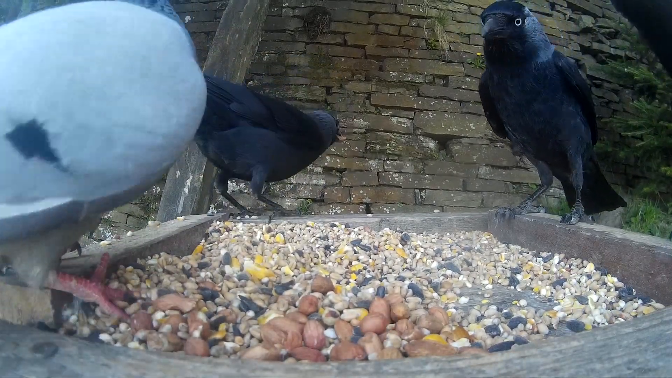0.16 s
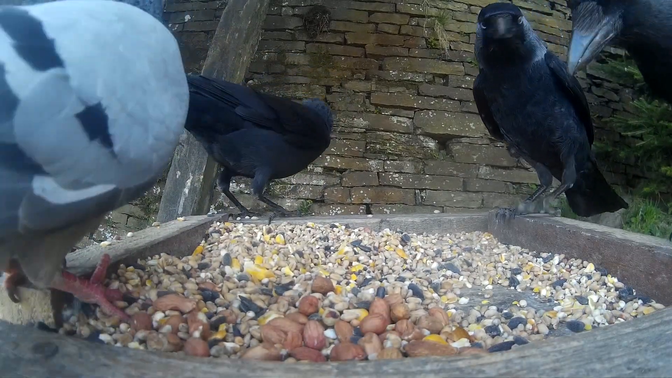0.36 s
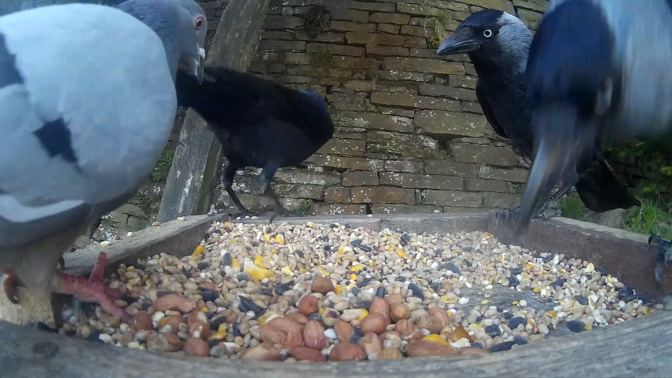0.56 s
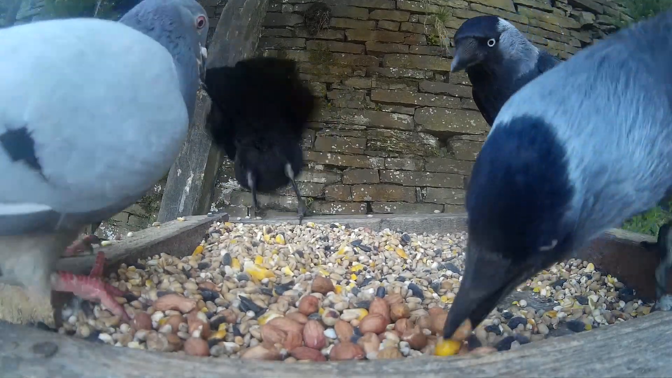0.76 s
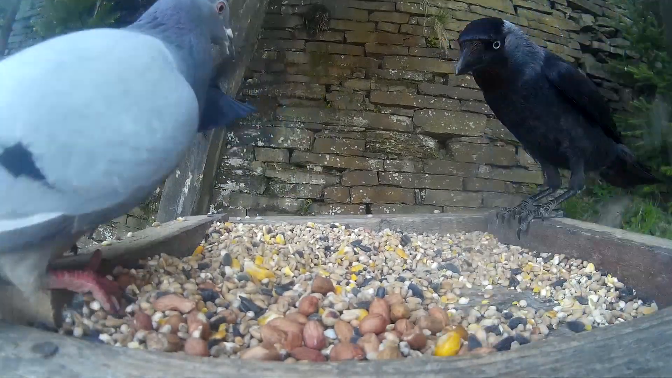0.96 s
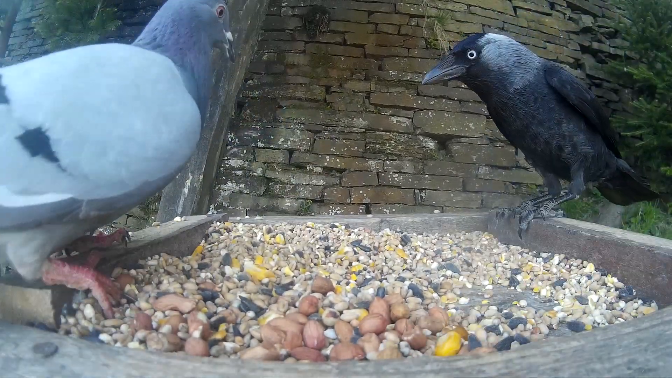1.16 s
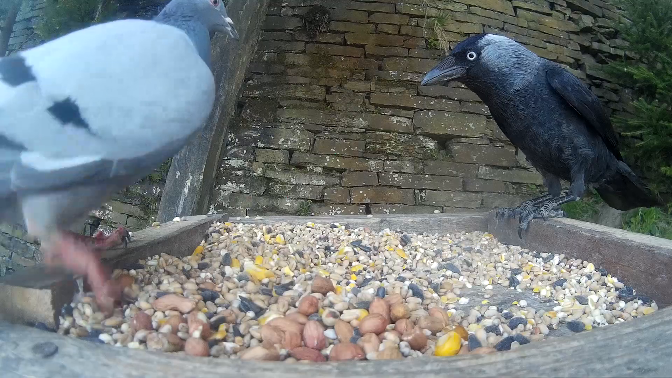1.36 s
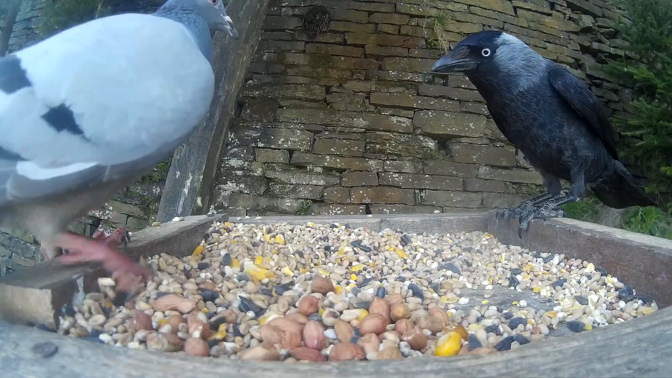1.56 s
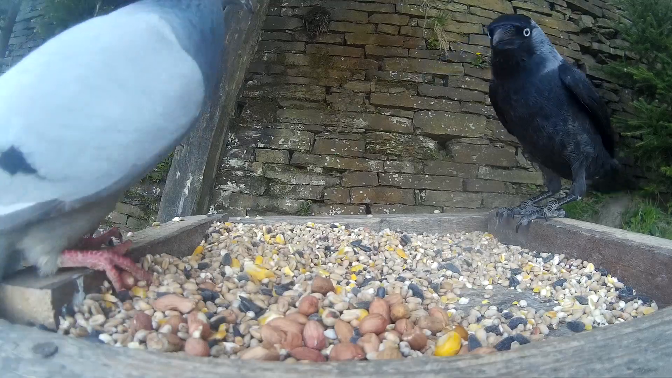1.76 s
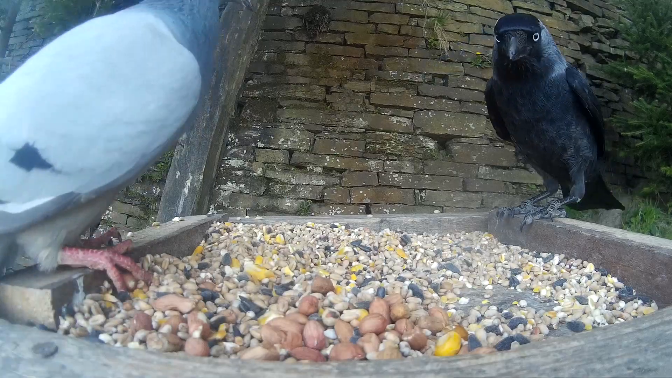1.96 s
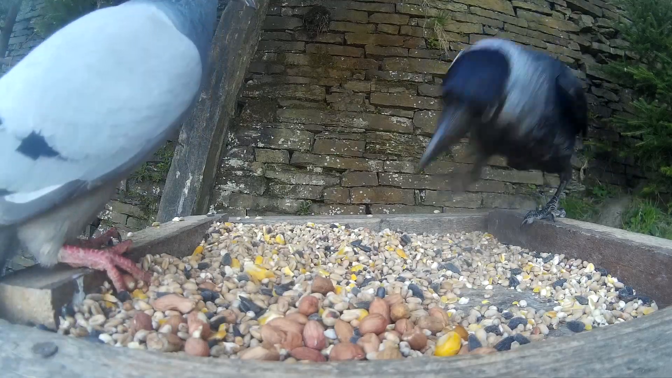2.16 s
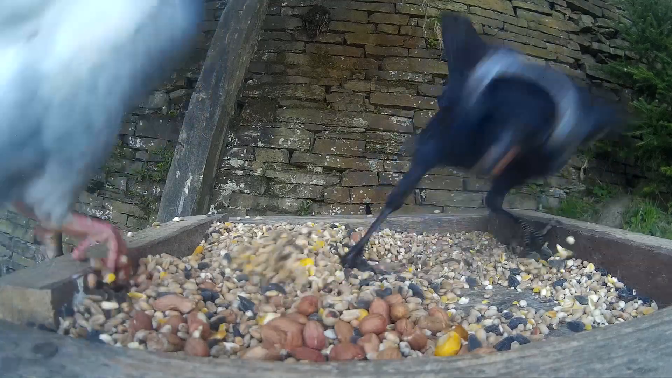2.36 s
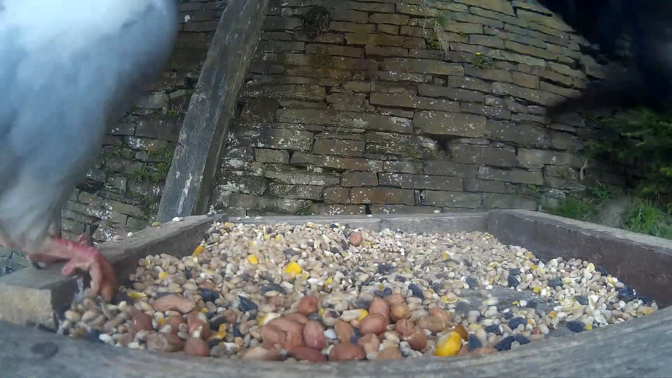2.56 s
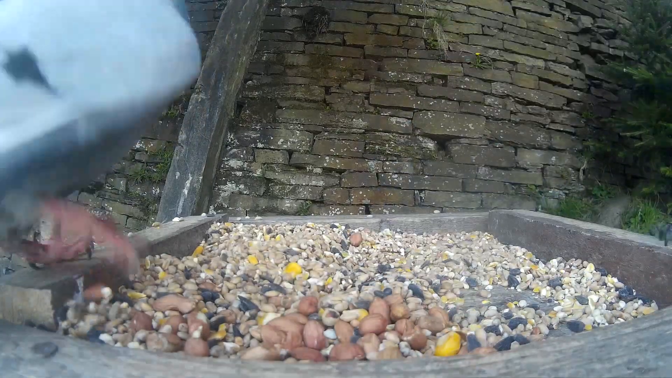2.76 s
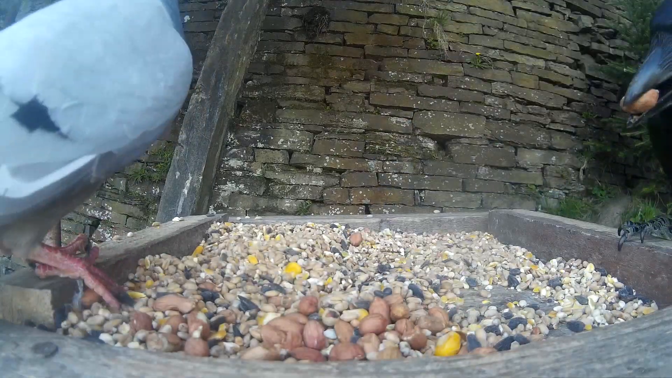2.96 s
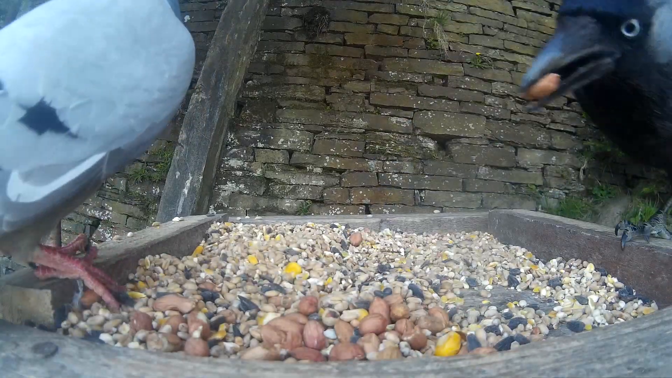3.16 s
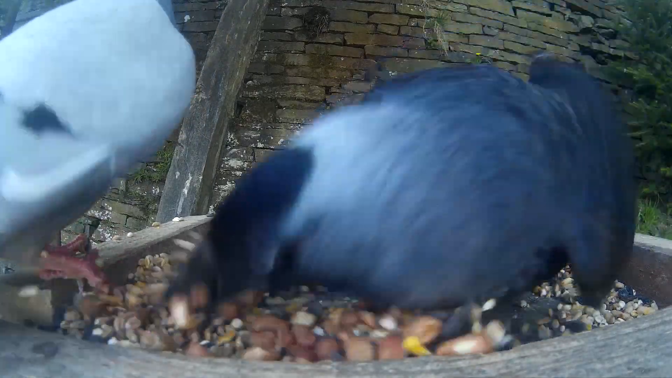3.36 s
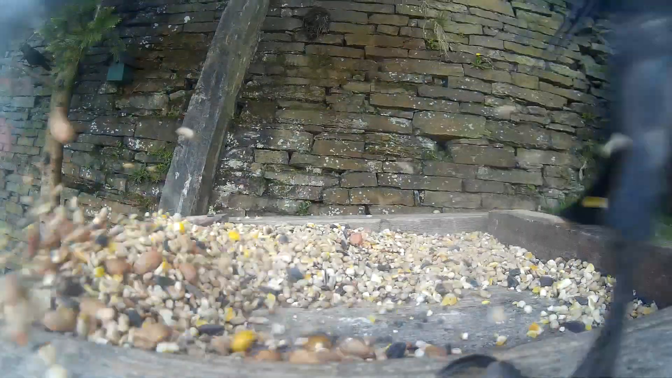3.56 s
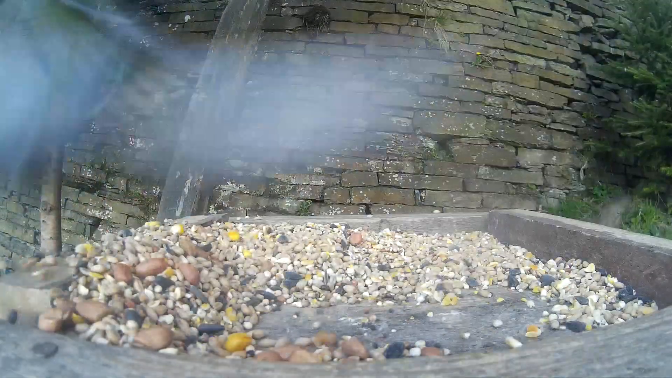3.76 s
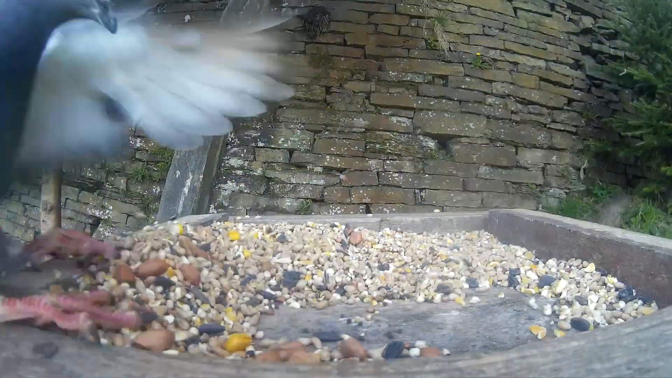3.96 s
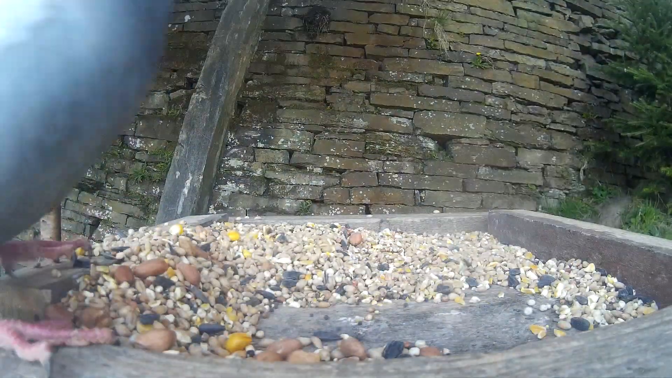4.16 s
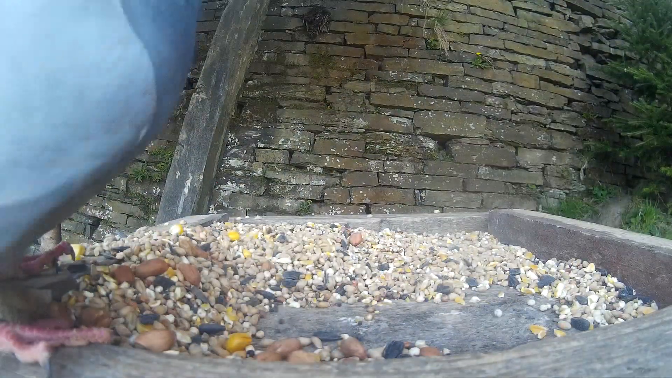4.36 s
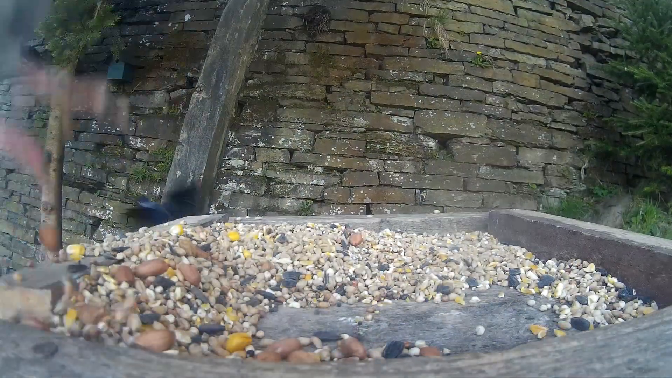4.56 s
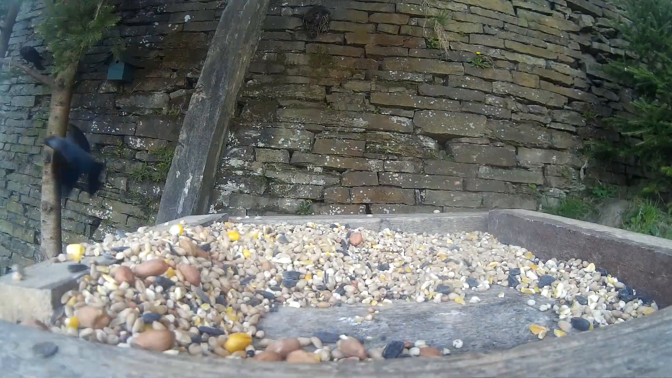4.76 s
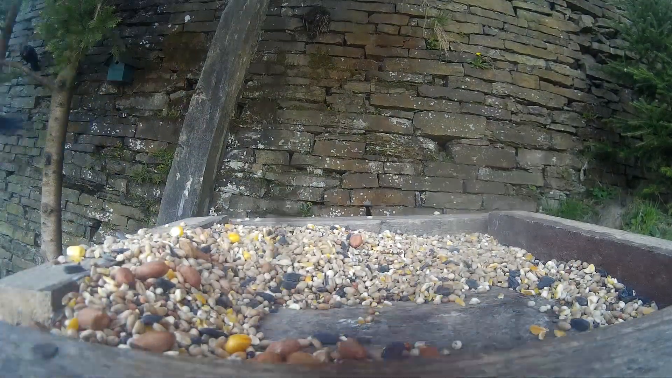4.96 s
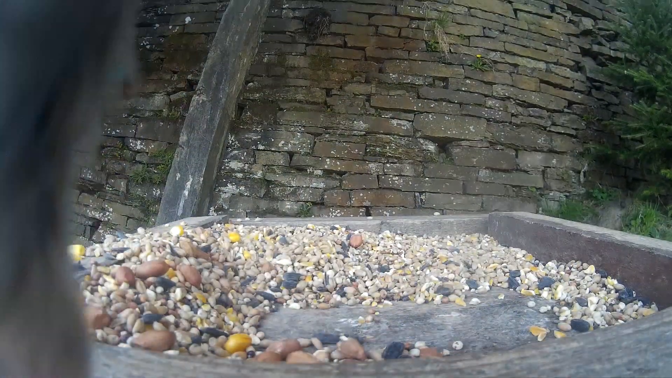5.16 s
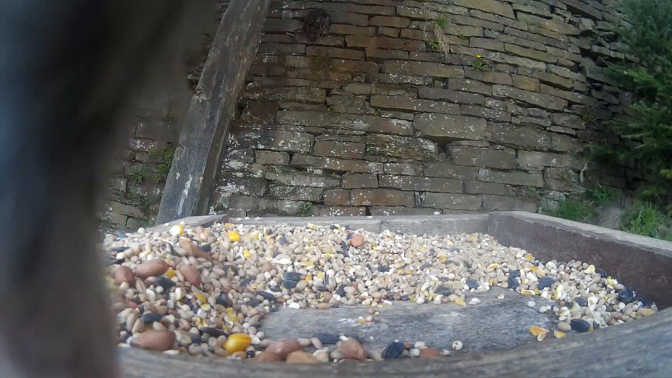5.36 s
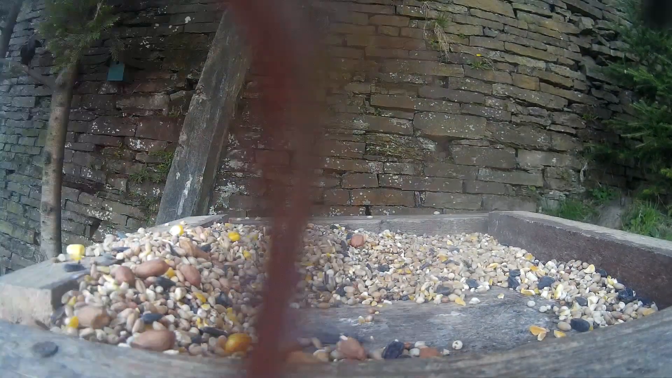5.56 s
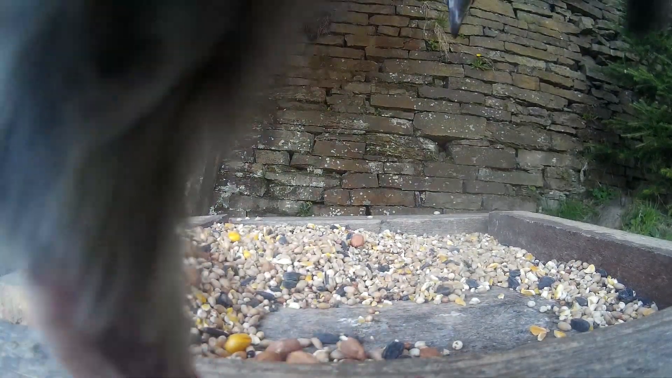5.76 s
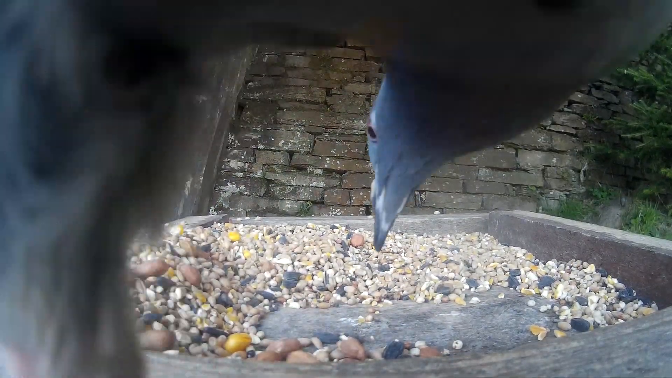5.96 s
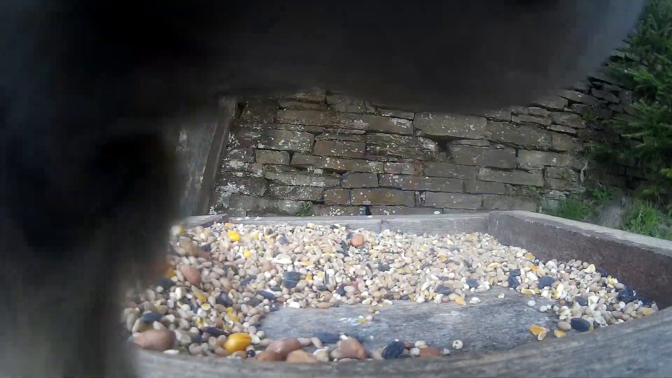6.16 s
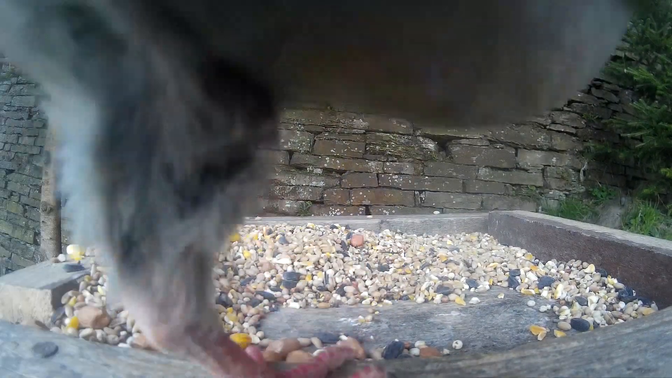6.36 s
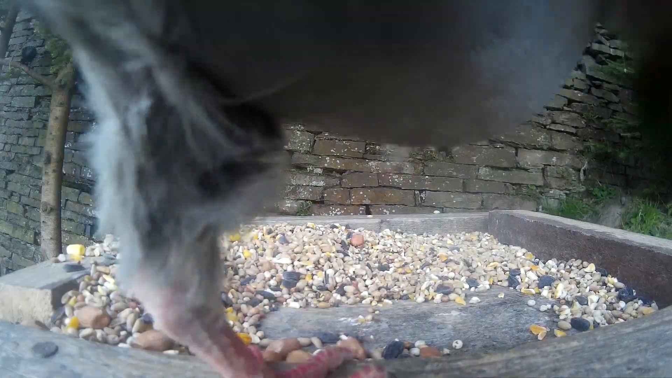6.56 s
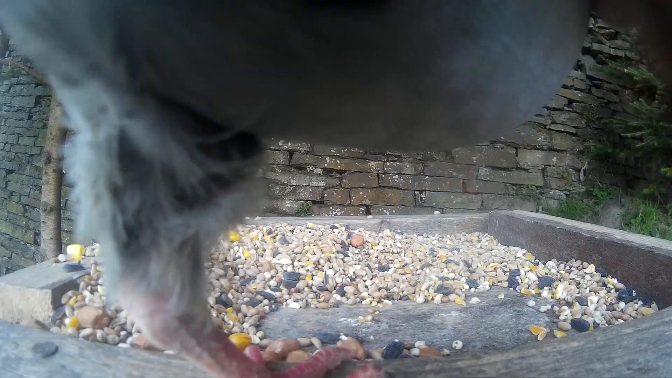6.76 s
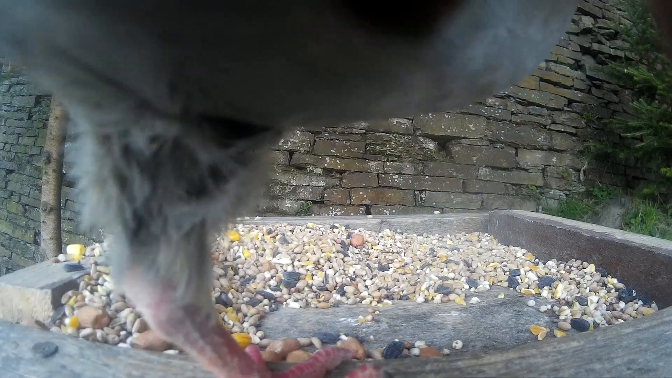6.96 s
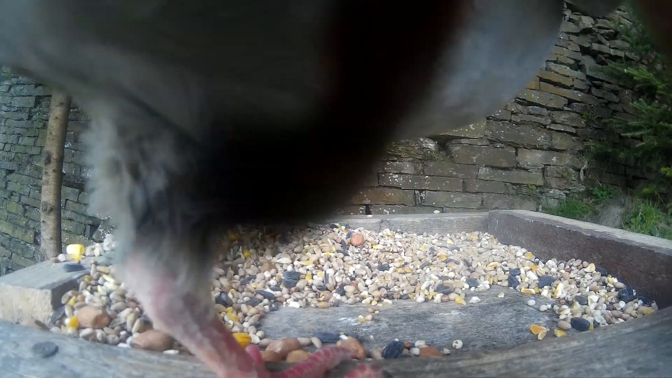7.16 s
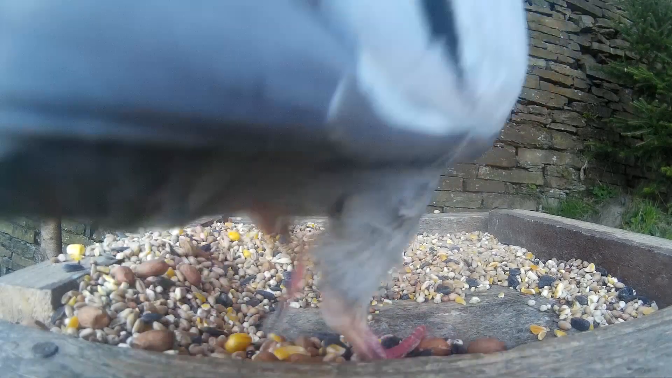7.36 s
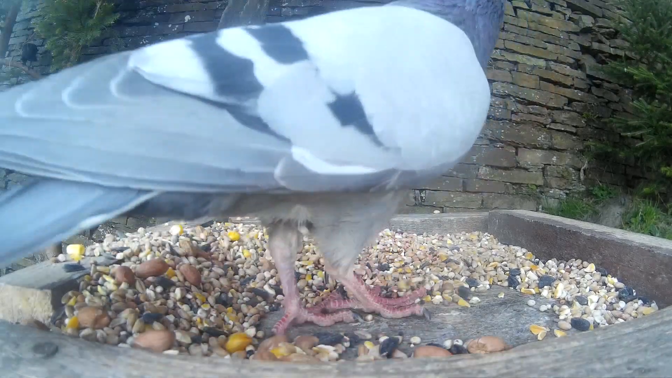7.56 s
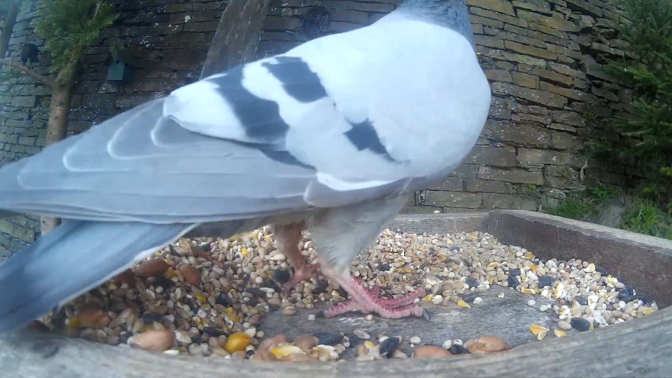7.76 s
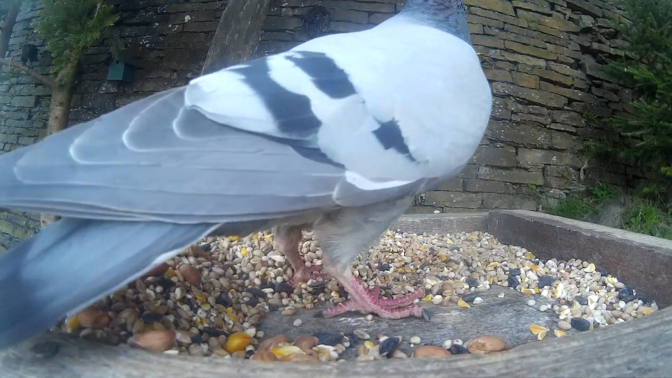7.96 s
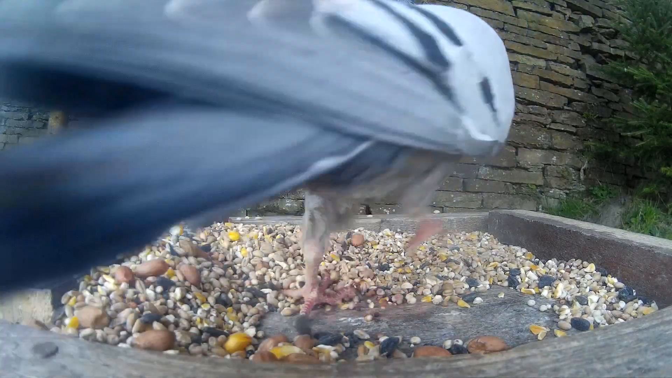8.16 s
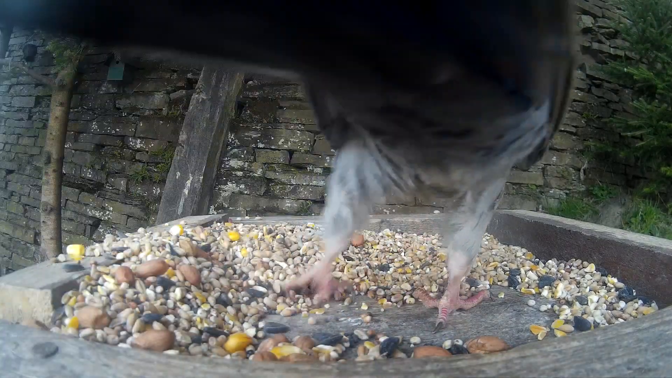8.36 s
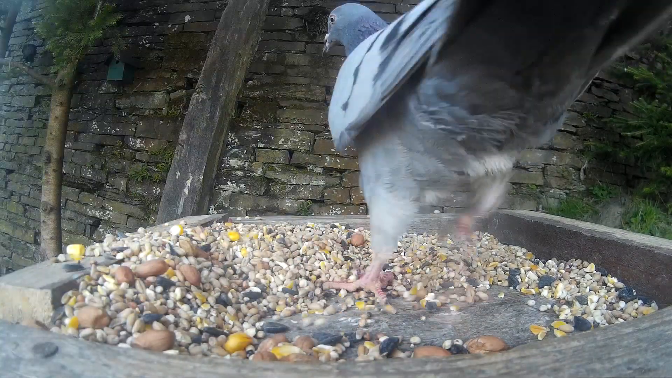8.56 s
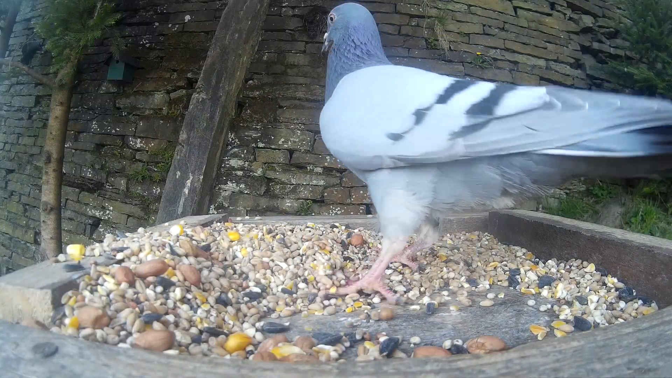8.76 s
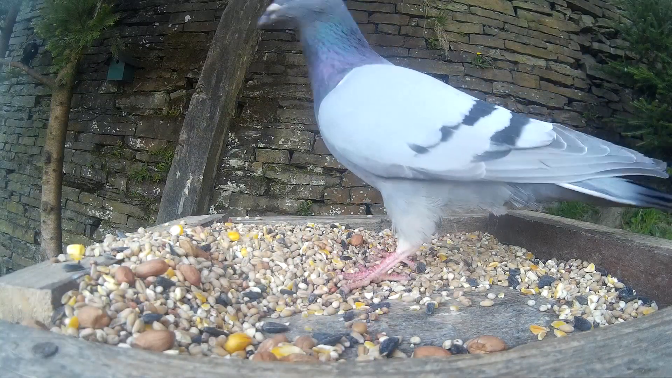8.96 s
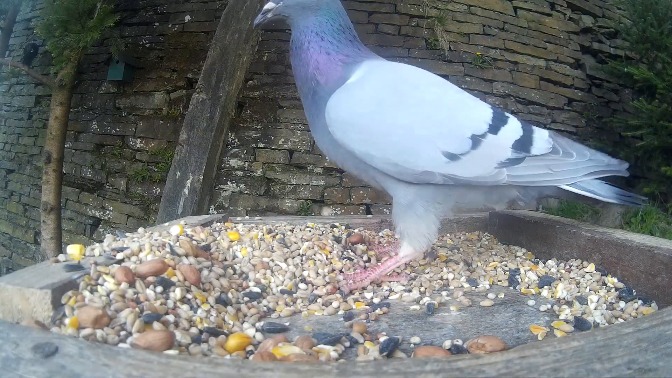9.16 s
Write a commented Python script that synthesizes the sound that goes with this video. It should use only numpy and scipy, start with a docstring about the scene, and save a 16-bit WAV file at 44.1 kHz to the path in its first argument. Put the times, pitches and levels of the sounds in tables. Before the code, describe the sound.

Pigeons and jackdaws feed on a hollow wooden table that carries the microphone. Light steps, dry taps and short scrapes through seed come first, with low wing puffs. Then a big takeoff: a rush of scattering seed, hard distorted knocks and booming wing gusts, with a second burst soon after and a brief metallic ring. Afterwards only sparse taps and faint rustles remain over soft distant hum and hiss.

```python
"""Birds on a wooden feeding table

Pigeons and jackdaws scrabble, peck and take off on a bird table that carries the microphone.
Blows, steps, taps and seed grains are noise forces that ring the resonant boards; wing beats are low
noise gusts on the membrane, and the loudest moments overload the input. A small metal fitting rings
as decaying sines after a few blows; far birds call in glides over shaped noise of traffic and hiss."""
import sys
import numpy as np
from scipy import signal
from scipy.fft import rfft, irfft, next_fast_len
from scipy.io import wavfile
from scipy.ndimage import uniform_filter1d

SR = 44100
rng = np.random.default_rng(int(sys.argv[2]) if len(sys.argv) > 2 else 0)


def dump_mix(stems):
    """Bounce the given channels to the path in sys.argv[1] as a 16-bit WAV at rate SR."""
    frames = np.atleast_2d(stems).T  # one column per channel
    limited = np.clip(frames, -1, 1)  # hard clip at full scale
    pcm = np.round(limited * 32767).astype(np.int16)
    wavfile.write(sys.argv[1], SR, pcm)


N = 409688


def amp(db):
    """Gain of a level in dB."""
    return 10 ** (np.asarray(db) / 20)


def evened(x):
    """Scales to rms 1."""
    return x / np.sqrt(np.mean(x ** 2) + 1e-20)


def mode(f, hz, width):
    """Causal response of one resonance, gain 1 at its centre."""
    return 1j * f * width / (hz ** 2 - f ** 2 + 1j * f * width)


def through(x, response):
    """Filters by a function of frequency."""
    size = next_fast_len(len(x))
    f = np.fft.rfftfreq(size, 1 / SR)
    return irfft(rfft(x, size) * response(f), size)[:len(x)]


def wander(hz):
    """Random drift of rms 1, falling off in speed above hz."""
    return evened(through(rng.standard_normal(N), lambda f: 1 / (1 + (f / hz) ** 2)))


def add(mix, s, sound):
    """Mixes a sound in at a time in seconds."""
    part = mix[max(round(s * SR), 0):][:len(sound)]
    part += sound[:len(part)]


def boards(f):
    """All board modes together, steep-sided, with dark valleys between them."""
    # modes of the boards: f/Hz, half the width at half amplitude/Hz, level/dB
    board_modes = [(164.2, 24, 5.5), (324.2, 50, 0.5), (507, 55, 1), (730, 55, -2), (855.4, 44.4, 3),
                   (990, 32, -7), (1189, 72.3, 0.5), (1382, 92, -4), (1637, 110, -5), (1834, 150, -10),
                   (2081, 52.4, -4.5), (2416, 157, -9.5), (2953, 160, -15.5), (3317, 180, -13.5),
                   (4276, 615, -24.5), (5660, 250, -36), (8030, 900, -38.5), (11000, 1500, -49)]
    response = 0
    for k, (hz, half_width, db) in enumerate(board_modes):
        sign = (-1) ** k
        response = response + sign * amp(db) * mode(f, hz, 2.01 * half_width) ** 2
    return response


def peak_evened(x):
    """Scales the strongest 3 ms to the rms of a sine of peak 1."""
    return x / np.sqrt(2 * uniform_filter1d(x ** 2, size=130).max())


def knock(db, hz, contact_s, click_db, thud_db):
    """A short rough contact rings the modes near the place struck, with a sharp click and a thud."""
    noise = rng.standard_normal((2, 6000))
    u = np.arange(6000) / SR / max(contact_s - .003, .0012)
    contact = u ** 0.7 * np.exp(-1.8 * u ** 2)  # force rises, holds and lets go

    def ring_response(f):
        near_place = 0.22 + mode(f, hz, .35 * hz)
        return boards(f) * near_place * 1j * f / (500 + 1j * f)

    ring = through(noise[0] * contact, ring_response)
    click = through(noise[1] * contact ** 2.0, lambda f: mode(f, 4900, 8000) ** 2 / (1 + 1j * f / 12000))
    thud = through(noise[0] * contact, lambda f: boards(f) * mode(f, 320, 400) ** 2)
    # click and thud levels are set against the ring
    return amp(db) * (peak_evened(ring) + amp(click_db) * peak_evened(click) + amp(thud_db) * peak_evened(thud))


def blows():
    """Hard blows of wings and claws; those that strike a low pitch carry more thud."""
    # t/s, ring level/dB, struck f/Hz, contact/s, click against the ring/dB
    hard_blows = [(2.404, -11.5, 1590, .013, -29.5), (2.475, -30.5, 1740, .0052, -7.5),
                  (3.421, -11, 1530, .02, -34), (3.516, -14, 1810, .017, -28.5),
                  (3.551, 7, 680, .016, -14.5), (3.614, 2.5, 2080, .014, -16.5),
                  (3.671, -8.5, 940, .0068, -7.5), (3.74, -9, 970, .0071, -15.5),
                  (3.764, -11, 2530, .0073, -36.5), (3.781, -18, 785, .0036, -24),
                  (3.812, -6.5, 824, .009, -33), (3.869, 6, 660, .01, -22), (3.906, -3.5, 650, .014, -30.5),
                  (3.981, 1.5, 1420, .0046, -15), (4.074, -28, 1190, .0075, -25),
                  (4.118, -12, 1000, .018, -28), (4.541, -1.5, 769, .003, -24),
                  (4.969, 8.5, 1050, .013, -21), (5.019, -8, 1620, .0063, -37),
                  (5.137, -1.5, 1300, .004, -14), (5.225, -18.5, 2140, .0089, -18),
                  (5.257, -31, 1000, .0081, -21), (5.275, -21, 850, .017, -6),
                  (5.309, -13, 2290, .0043, -15), (5.319, -19, 850, .011, -22),
                  (5.608, -9.5, 2900, .0077, -20)]
    thud_at_700_hz_db, thud_db_per_octave = -5.0, -15
    out = np.zeros(N)
    for s, db, hz, contact_s, click_db in hard_blows:
        thud_db = thud_at_700_hz_db + thud_db_per_octave * np.log2(hz / 700)
        add(out, s, knock(db, hz, contact_s, click_db, thud_db))
    return out


def steps():
    """Steps and hops put the bird's weight into the boards, so the thud is strong and the click weak."""
    # t/s, ring level/dB, struck f/Hz
    footfalls = [(.012, -16, 500), (.246, -28.5, 774), (.638, -18, 1290), (.863, -12, 950),
                 (.879, -12, 700), (1.046, -22, 1290), (1.617, -35, 2030), (1.816, -40.5, 1760),
                 (2.708, -10.5, 1230), (2.793, -16, 1240), (3.726, -6, 830), (3.954, -8, 740),
                 (4.237, -17, 728), (4.659, -29, 1260), (5.285, -19, 330), (6.203, -26.5, 1150),
                 (6.338, -23.5, 1266), (6.993, -29.5, 1053)]
    out = np.zeros(N)
    for s, db, hz in footfalls:
        add(out, s, knock(db, hz, contact_s=.011, click_db=-52, thud_db=-3.5))
    return out


def taps():
    """Beak and claw taps are dry and light, with little thud."""
    # t/s, ring level/dB, struck f/Hz, contact/s
    light_taps = [(.087, -20.5, 1190, .0054), (.115, -20, 1190, .027), (.594, -23, 1260, .0085),
                  (.929, -19, 1410, .017), (1.448, -33, 800, .01), (2.311, -20, 1280, .0059),
                  (2.376, -19, 880, .011), (2.652, -24, 780, .0076), (2.724, -12.5, 747, .019),
                  (2.765, -12, 1270, .016), (2.962, -35, 1800, .006), (2.991, -30, 1770, .0075),
                  (3.01, -30, 1780, .0061), (3.05, -33, 1300, .01), (3.09, -28.5, 1290, .0083),
                  (3.217, -24, 1320, .02), (4.696, -26.5, 790, .012), (5.524, -30.5, 840, .029),
                  (5.934, -22.5, 830, .016), (5.971, -23, 914, .021), (6.082, -32, 1296, .008),
                  (6.268, -29.5, 825, .011), (6.584, -21, 1040, .017), (6.623, -13.5, 1020, .009),
                  (6.678, -25, 1100, .035), (6.85, -28, 1280, .015), (6.918, -20.5, 1160, .0067),
                  (7.305, -15, 1400, .0064), (7.402, -25.5, 850, .019), (7.558, -32, 1320, .012),
                  (8.231, -28, 1300, .021), (8.528, -26.5, 1270, .012), (8.756, -33.5, 840, .016),
                  (8.872, -33, 1460, .0049), (9.175, -31, 1900, .016)]
    out = np.zeros(N)
    for s, db, hz, contact_s in light_taps:
        add(out, s, knock(db, hz, contact_s, click_db=-48, thud_db=-20))
    return out


def scrabble_pressure():
    """Claws drag through seed at an easing pressure; kicked-up seed rattles down and settles fast."""
    # claws dragged through the seed: t/s, length/s, starting pressure level/dB
    scrapes = [(0.0, .065, -36), (.087, .093, -41), (.191, .027, -42), (.464, .022, -46), (.514, .045, -42),
               (.572, .05, -41), (.675, .07, -39), (.785, .06, -43), (.835, .08, -35), (.918, .05, -32),
               (1.635, .13, -55), (2.226, .27, -30), (2.498, .11, -39), (2.65, .06, -43), (2.71, .12, -36),
               (2.836, .096, -48), (3.15, .065, -46), (3.208, .062, -36), (3.3, .03, -36), (3.33, .25, -23),
               (3.63, .4, -41), (4.03, .09, -40), (4.12, .1, -47), (4.475, .07, -40), (5.272, .07, -36),
               (5.612, .03, -37), (5.724, .057, -55), (5.883, .05, -50), (5.94, .07, -40),
               (6.054, .11, -52), (6.25, .04, -38), (6.312, .25, -50), (6.547, .18, -46), (7.11, .05, -44),
               (7.156, .05, -35), (7.36, .08, -40), (7.45, .23, -51), (7.727, .081, -55), (8.124, .14, -45),
               (8.265, .2, -57), (8.466, .11, -43), (8.643, .053, -45), (8.694, .17, -54)]
    # seed kicked up: t/s, starting pressure level/dB
    scatters = [(3.552, -19), (4.627, -47), (4.98, -21), (7.31, -29), (8.875, -46)]
    ease_db = -3.0  # over each scrape
    settle_db_per_s, settle_s = -190, .11
    pressure = np.full(N, amp(-65))  # seed keeps settling faintly between scrapes
    strokes = [(s, length, db, ease_db) for s, length, db in scrapes]
    strokes += [(s, settle_s, db, settle_db_per_s * settle_s) for s, db in scatters]
    for s, length, from_db, change_db in strokes:
        db = from_db + np.linspace(0, change_db, round(length * SR))
        fade = signal.windows.tukey(len(db), min(0.02 / length, 1))
        add(pressure, s, amp(db) * fade)
    return pressure


def scrabble():
    """Grains in loose clumps ring the boards at several spots: sparse when light, a rush when hard."""
    # spots on the boards, each favouring the modes near one pitch: f/Hz
    spots_hz = [830, 1300, 2080, 3300, 9000]
    grains_per_s = 2000  # at each spot, in a full rush
    rush_db, lightest_share = -32, .11
    pressure = scrabble_pressure()
    share = np.clip(pressure / amp(rush_db), lightest_share, 1)  # share of the seeds that move
    count = next_fast_len(N)
    f = np.fft.rfftfreq(count, 1 / SR)
    wood = boards(f) * 1j * f / (280 + 1j * f)
    clumps_db = 3 * np.clip(wander(50.), -2, 2)  # shared by all spots
    out, full_rush = 0, 0
    for hz in spots_hz:
        size_db = 3 * np.minimum(rng.exponential(1, N), 3) + 3 * np.clip(wander(25.), -2, 2)
        size = amp(size_db + clumps_db) * rng.standard_normal(N)
        lot = rng.random(N) * SR / grains_per_s  # a grain falls where its lot is below the share
        spot = wood * (.25 + mode(f, hz, .4 * hz))
        moved = size * (lot < share) * pressure / np.sqrt(share)  # fewer grains, each stronger
        out = out + rfft(moved, count) * spot
        full_rush = full_rush + rfft(size * (lot < 1), count) * spot
    # the full rush at unit pressure sets the level
    return amp(2.0) * irfft(out, count)[:N] / np.std(irfft(full_rush, count))


def gusts():
    """Each wing beat is a lumpy push on the membrane, with faster eddies in bursts."""
    # wing draught over the microphone: t/s at the middle, level/dB; the nearer the wing, the stronger
    wing_beats = [(.033, -48), (.606, -49), (.86, -32), (1.04, -33), (1.13, -34), (1.278, -27),
                  (1.493, -32), (1.574, -36), (2.123, -44.5), (2.349, -35), (2.468, -30), (2.538, -24),
                  (2.65, -32), (2.747, -30), (3.37, -44), (3.46, -42), (3.557, -18.5), (3.717, -17),
                  (3.816, -8), (3.897, 0), (3.987, -2.5), (4.08, -34), (4.18, -36), (4.51, -31),
                  (4.575, -14), (4.72, -33), (4.83, -19), (4.882, -8.5), (4.95, -13), (5.0, -14),
                  (5.07, -30), (5.293, -42)]
    shortest_s, longer_s_per_db = .04, .0018  # a gust at 0 dB, and what each dB below it adds
    push = evened(through(rng.standard_normal(N), lambda f: mode(f, 27, 47) / (1 + 1j * f / 220) ** 2))
    bursts = amp(5.6 * np.clip(wander(20.0), -2, 2))
    eddies = through(rng.standard_normal(N) * bursts, lambda f: mode(f, 180, 330) / (1 + 1j * f / 1200) ** 3)
    eddies = amp(-0.8) * evened(eddies)
    t, out = np.arange(N) / SR, np.zeros(N)
    for s, db in wing_beats:
        length = shortest_s - longer_s_per_db * db
        near = slice(max(round((s - .3) * SR), 0), round((s + .3) * SR))
        swell = np.exp(-.9 * abs(2 * (t[near] - s) / length) ** 1.6)
        gust = (push[near] + eddies[near] * swell) * swell  # eddies break off at the crest
        out[near] += amp(db) * gust * np.linalg.norm(swell) / np.linalg.norm(gust)
    return out


def fitting():
    """The small metal fitting rings in slowly dying modes; the close pair beats."""
    # modes of the metal: f/Hz, time to fall by 60 dB/s
    metal_modes = [(1513, .35), (1577, .3), (2482, .45)]
    # when it is set ringing: t/s, then the starting level/dB of each mode
    rings = [(3.985, -46, -46, -50), (4.985, -19, -23, -60), (5.07, -60, -60, -50), (5.612, -70, -70, -47),
             (6.925, -46, -52, -70)]
    out, t = np.zeros(N), np.arange(SR // 2) / SR
    for s, *levels_db in rings:
        for (hz, t60), db in zip(metal_modes, levels_db):
            add(out, s, amp(db - 60 * t / t60) * np.sin(2 * np.pi * hz * t))
    return out


def far_calls():
    """Far birds call in soft glides that swell and fade, blurred by distance."""
    # t/s, length/s, from f/Hz, to f/Hz, level before the blur/dB
    glides = [(1.49, .05, 2150, 1850, -57), (1.8, .24, 330, 355, -53), (7.97, .11, 2620, 1900, -59),
              (9.05, .075, 2750, 1900, -60)]
    out = np.zeros(N)
    for s, length, from_hz, to_hz, db in glides:
        hz = np.linspace(from_hz, to_hz, round(length * SR))
        swell = np.hanning(len(hz)) ** .5
        add(out, s, amp(db) * swell * np.sin(2 * np.pi * np.cumsum(hz) / SR))
    blur = .6 + .8 * wander(150.)
    return out * blur


def air():
    """Steady noise shaped as far traffic hum and microphone hiss."""
    # spectrum of hum and hiss: f/Hz, relative level per Hz/dB
    spectrum = [(15, -47), (25, -0.5), (108, -8.5), (177, -4), (349, -7), (568, -5), (878, -0.5),
                (1150, -12), (1680, -19), (2820, -36.5), (6040, -34), (14400, -35.5), (16500, -56.5)]
    hz, db = np.transpose(spectrum)
    hum = through(rng.standard_normal(N), lambda f: amp(np.interp(np.log(f + 1), np.log(hz), db)))
    return amp(-50) * evened(hum)


def scene():
    """Everything reaches the one microphone on the table."""
    table = blows() + steps() + taps() + scrabble()
    mix = table + gusts() + fitting() + far_calls() + air()
    return mix[None]


def record(dry):
    """The input stage clips with a hard knee; then the band limit."""
    overload = 0.74  # ceiling of the input stage
    clipped = dry / (1 + abs(dry / overload) ** 8.) ** (1 / 8.)
    low_pass = signal.firwin(255, 16500, window=("kaiser", 9), fs=SR)  # edge in Hz
    return signal.oaconvolve(clipped, low_pass[None], "same")


dry = scene()
out = record(dry)
dump_mix(out)
```